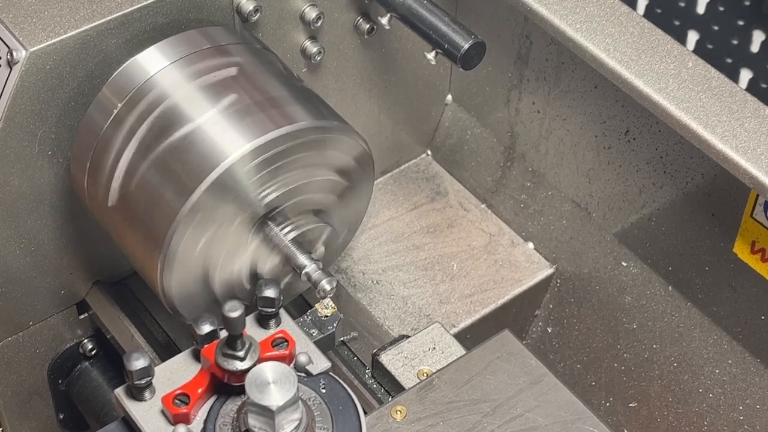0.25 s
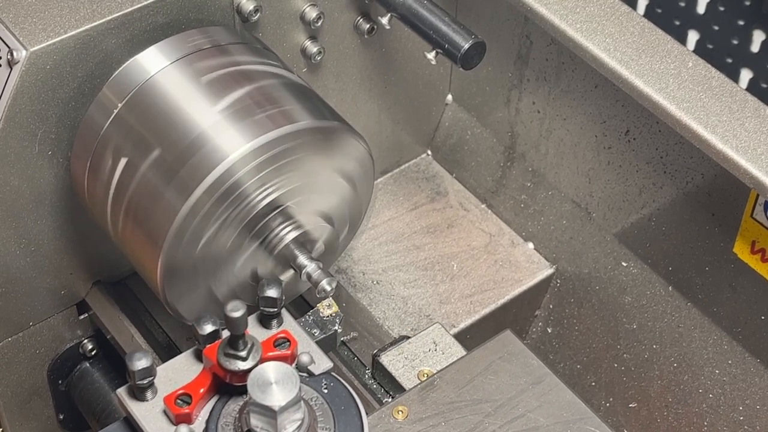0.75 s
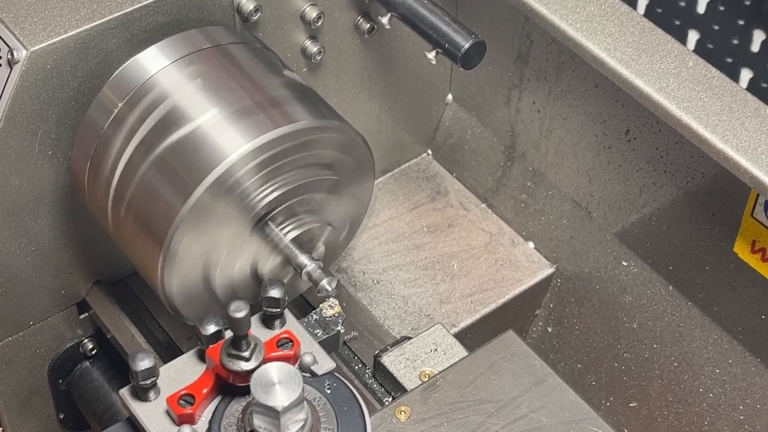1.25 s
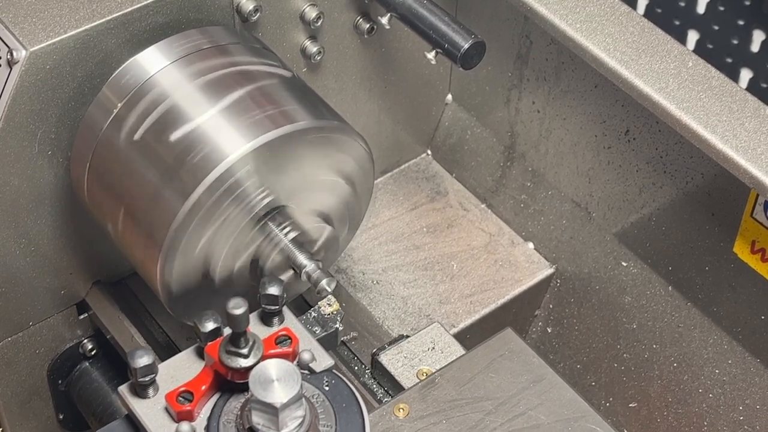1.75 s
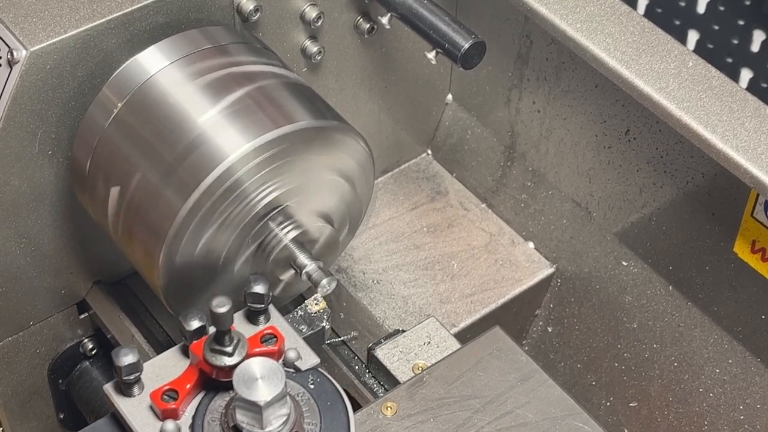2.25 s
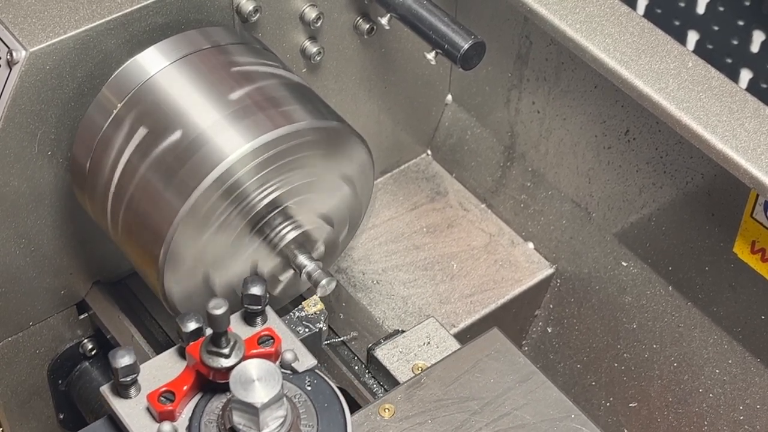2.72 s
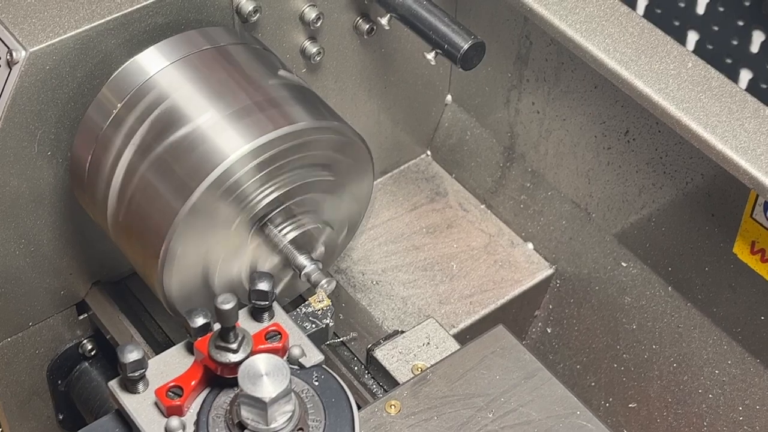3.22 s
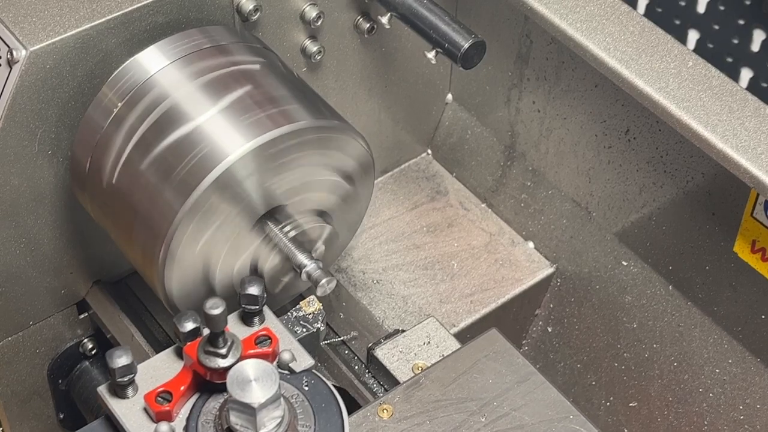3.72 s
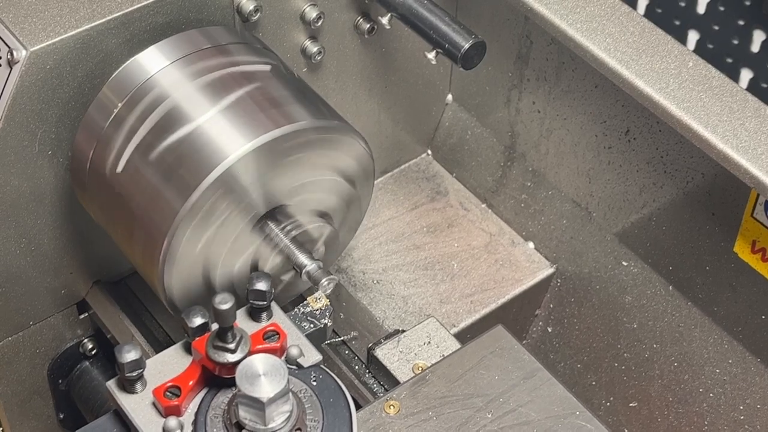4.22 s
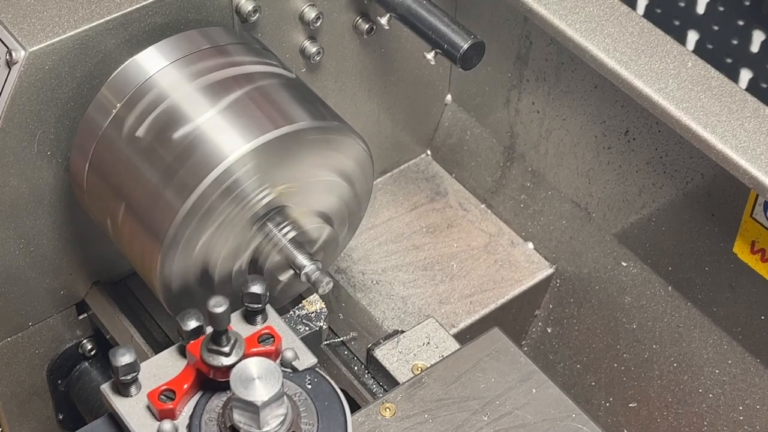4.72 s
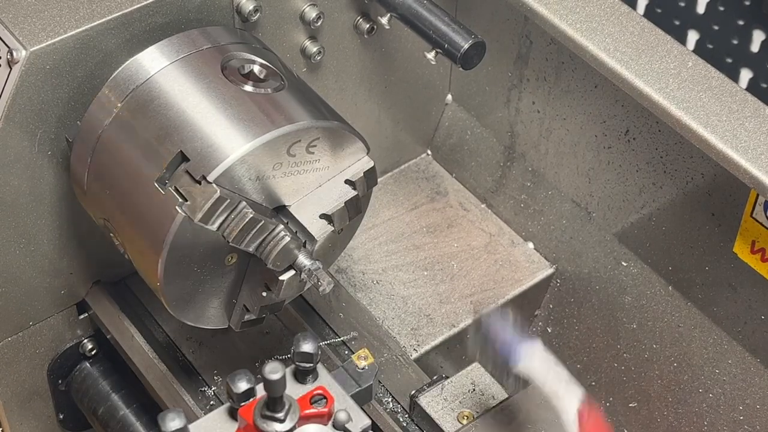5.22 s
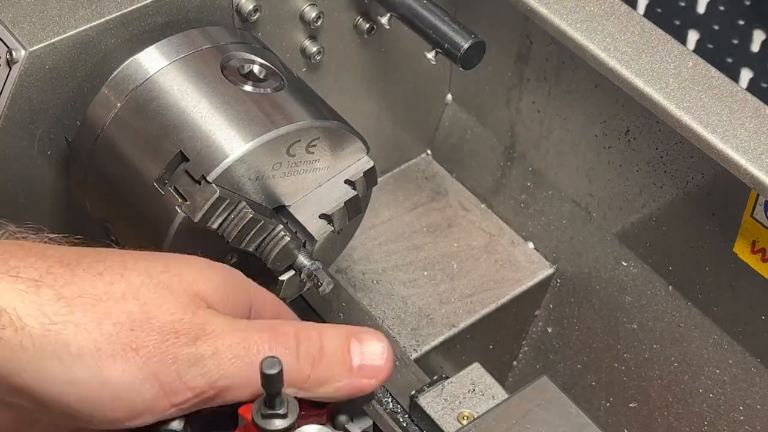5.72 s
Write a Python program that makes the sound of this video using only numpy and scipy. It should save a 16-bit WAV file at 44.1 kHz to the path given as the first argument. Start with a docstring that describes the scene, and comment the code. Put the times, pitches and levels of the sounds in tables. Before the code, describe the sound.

In a quiet workshop, a small metal lathe is heard up close: a steady gear whine, rattling teeth and a rumbling bed, with a faint high motor tone, light cutting sizzle and scattered sharp ticks. Near the end it stops quickly with a brief groan. Short metal scrapes and dull bumps follow as the slide moves back, along with one hard clack on the tool post.

```python
"""A small benchtop lathe trims a metal rod, close by: its gears whine and rattle in the headstock.
Underneath, the bed rumbles and the motor drive sings faintly; on top, the cutter sizzles, with thin ticks.
After five seconds it brakes with a short groan. The slide is drawn back with a few scrapes and bumps,
and metal clacks on the tool post, over the room tone of a quiet workshop."""
import sys
import numpy as np
from scipy import signal
from scipy.fft import rfft, irfft, next_fast_len
from scipy.io import wavfile
from scipy.ndimage import map_coordinates

SR = 44100
rng = np.random.default_rng(int(sys.argv[2]) if len(sys.argv) > 2 else 0)


def wrap_up_sound(samples):
    """Save the sound to the file named by the first command line argument, as 16-bit audio."""
    columns = np.atleast_2d(samples).T
    # keep every value between -1 and 1, then stretch to whole-number steps
    tamed = np.clip(columns, -1, 1)
    steps = np.round(tamed * 32767).astype(np.int16)
    wavfile.write(sys.argv[1], SR, steps)


N = 262836
T = np.arange(N) / SR
MESH_HZ = 914.8  # gear teeth meeting per second
CHUCK_HZ, PULLEY_HZ, IDLER_HZ = 7.68, 12.69, 17.89  # turns per second
BRAKE_S, STOP_S = 4.965, 5.085  # braking starts, spindle stands still

# room tone colour: freq_hz, gain_db
ROOM_EQ = [(25, -2.5), (64, -3.5), (220, -9), (400, -13), (900, -20.5), (1500, -23.5), (3000, -34.5),
           (5500, -38.5), (10000, -45.5), (15000, -55.5)]
# soft bumps of the carriage: crest_s, pitch_hz, half_length_s, level_db
CARRIAGE_BUMPS = [(5.201, 120, .014, -58.5), (5.398, 117, 0.033, -52.5), (5.467, 85, .01, -40.5),
                  (5.488, 62, 0.014, -45), (5.52, 115, 0.016, -50), (5.578, 300, .006, -50),
                  (5.595, 106, 0.0071, -37.5), (5.597, 520, 0.0025, -51), (5.632, 70, 0.017, -59),
                  (5.701, 259, 0.021, -63), (5.703, 680, 0.012, -60), (5.744, 420, .004, -36.5),
                  (5.748, 140, 0.011, -45), (5.809, 64.4, .02, -48.5), (5.828, 250, .012, -59),
                  (5.95, 380, .014, -66.5)]
# strokes of the slide: start_s, length_s, level_db, bright_offset_db
SLIDE_STROKES = [(5.228, 0.049, -69, 7.5), (5.321, 0.04, -47, -29), (5.367, 0.059, -66, -18),
                 (5.455, 0.0366, -46, -23), (5.497, 0.0052, -42.5, -17), (5.507, 0.0075, -42.5, -17),
                 (5.598, 0.0018, -59, 2), (5.62, .03, -68.5, -20), (5.719, 0.031, -47.5, -12.5),
                 (5.757, .032, -53.5, -18), (5.823, 0.042, -68, -8)]
# dull body of a scrape: freq_hz, gain_db
SCRAPE_DULL_EQ = [(100, -8.5), (160, 1), (380, -1.5), (650, -11), (980, -13), (1400, -6), (2450, -15),
                  (2950, -13), (3600, -21), (4200, -18.5), (6200, -29), (8000, -41.5), (14000, -56)]
# bright edge of a scrape: freq_hz, gain_db
SCRAPE_BRIGHT_EQ = [(880, -51.5), (1500, -12), (3090, -6), (3760, -5.5), (7600, -12.5), (8460, -19),
                    (12400, -11), (15500, -22.5)]
# hit on the tool post: start_s, gain_db
POST_HITS = [(5.735, -15)]
# ringing modes of the tool post: pitch_hz, gain_db, t60_s
POST_MODES = [(370, -14.5, 0.084), (628, -14, .06), (970, -17, .05), (1440, -14, .04), (1970, 0.5, 0.013),
              (2170, -19.5, .035), (2600, -7.5, .025), (3480, 5, 0.017), (3700, -16, .022),
              (4510, -4.5, .02), (5250, -4.5, .025), (6560, -12.5, 0.028), (10640, -9, 0.024)]
# attack of the clack: freq_hz, gain_db
CRACK_EQ = [(88, -30), (150, -9), (1620, -6), (1890, 3), (2390, -10.5), (3460, -4.5), (5520, -12),
            (8150, -28), (10900, -15.5), (14600, -28), (15800, -44.5)]
# fader of the running machine, falling away at the stop: time_s, gain_db
RUN_FADER = [(0, 0), (4.985, 0), (5.005, -8.5), (5.032, -10.5), (5.04, -21.5), (5.075, -28), (5.09, -71)]
# switching tones of the motor drive: pitch_hz, relative_db
DRIVE_TONES = [(7698, -76.5), (8780, -79), (8952, -79), (9119, -79), (9265, -78), (9437, -80.5),
               (9528, -77), (9690, -73), (10029, -73.5), (10675, -80.5)]
# the sharpest ticks: start_s, relative_db
SHARP_TICKS = [(0.1406, -43), (0.3815, -42), (0.4778, -45), (0.526, -45), (0.755, -41), (0.8874, -44.5),
               (0.9467, -44.5), (1.3105, -39.5), (1.6821, -45), (1.7424, -44.5), (1.923, -43.5),
               (2.056, -42), (2.37, -46), (2.4653, -44.5), (2.527, -42.5), (2.7631, -41), (2.8389, -41.5),
               (2.8873, -44.5), (3.1762, -47), (3.8267, -45), (3.8631, -42), (3.9115, -44.5), (4.0442, -43),
               (4.2487, -42), (4.9711, -45.5), (5.4894, -57.5)]
# bearing hiss: freq_hz, gain_db
BEARING_EQ = [(7500, -22), (8500, -4.5), (9300, 4.5), (10800, 0), (11300, -4), (13000, -9), (15800, -20.5)]
# cutter sizzle: freq_hz, gain_db
SIZZLE_EQ = [(8500, -32.5), (10000, 0), (11200, 0), (12500, -7.5), (14000, -13.5), (15800, -25.5)]
# bites of the cutter: start_s, hold_s, level_db
CUTTER_BITES = [(0.62, .1, -71), (2.33, .12, -69), (2.98, .14, -62.5), (3.97, .25, -61.5)]
# rumble of the bed: freq_hz, gain_db
BED_EQ = [(20, -18), (60, -13.5), (130, -15), (175, -3.5), (208, -10), (250, -2), (330, 0), (395, -2),
          (440, 1.5), (480, -6.5), (570, -7), (640, -13.5), (760, -16), (1000, -56.5)]
# the machine shakes harder for a moment: crest_s, half_length_s, rumble_rise_db, shudder_rise_db
SHAKE_SURGES = [(0.177, 0.042, 7, 11.5), (0.24, 0.013, 5, 4), (0.423, 0.046, 2, 11), (0.686, 0.029, 6, 1),
                (0.893, .03, 3, 4), (1.05, 0.23, 1, 3.5), (2.452, .03, 4, 3), (3.3, .1, 1.2, 3),
                (4.18, .14, 4, 13.5)]
# groan of the braking motor: time_s, pitch_hz, relative_db
BRAKE_GROAN = [(4.97, 382, -39), (4.988, 380, -33.5), (5.014, 317, -41), (5.044, 364, -47),
               (5.064, 360, -45), (5.08, 362, -69)]
# tone of the gear case: freq_hz, gain_db
CASE_EQ = [(400, -48.5), (700, -27.5), (880, -5), (1100, -14.5), (1250, -3), (1420, -2), (1580, -6.5),
           (1750, -3.5), (2080, -2), (2600, -14.5), (3300, -16), (4000, -22), (5800, -23.5), (7200, -35),
           (8300, -40.5), (11000, -70)]
# narrow rings of the gear train and housing: pitch_hz, nominal_width_hz, relative_db
GEAR_RINGS = [(101.8, 6.9, -57.5), (147.5, 7, -55), (168.8, 9, -52.5), (250.8, 9.1, -51.5),
              (357.4, 23.4, -49.5), (433.7, 25, -51.5), (500, 15, -55.5), (981, 41, -52), (1318, 16.4, -42),
              (1477, 32, -43.5), (1778, 24, -49.5), (2212, 36, -47.5), (2346, 110, -48.5), (2494, 36, -57),
              (3130, 67, -56.5), (3297, 73, -53.5), (3754, 38, -62), (4434, 120, -63.5), (4826, 150, -58.5),
              (5490, 91, -58), (6035, 54, -62.5), (6710, 99, -68), (10690, 160, -70.5), (12440, 70, -84)]
# brief knocks of backlash in the gears: crest_s, rattle_rise_db
BACKLASH_KNOCKS = [(0.32, 2), (0.71, 1), (1.74, 3.5), (1.90, 3.5), (3.95, 1.5), (4.345, 2), (4.41, 2),
                   (4.63, 1)]
# faders of the whine's main tone and third harmonic: time_s, main_relative_db, third_relative_db
WHINE_FADERS = [(0.0, -40.5, -49.5), (0.2, -38.5, -52.5), (1.1, -40.5, -51), (2.1, -38.5, -52.5),
                (2.3, -44, -54.0), (2.45, -39.5, -53), (3.0, -42, -51), (3.1, -39.5, -52.5),
                (3.55, -41.0, -54), (3.75, -43, -48.5), (3.95, -40.5, -51.5), (4.55, -42.5, -53.5),
                (4.7, -39, -52.5), (4.94, -40, -54)]


def amp(db):
    """Decibels to gain."""
    return 10 ** (np.asarray(db) / 20)


def unit(x):
    """Scale to rms 1."""
    return x / np.sqrt(np.mean(x ** 2) + 1e-20)


def running():
    """Gain of the machine: full until it stops short."""
    return amp(np.interp(T, *np.transpose(RUN_FADER)))


def swell(crest_s, half_s):
    """A bell-shaped envelope of height 1."""
    return np.exp(-((T - crest_s) / half_s) ** 2)


def release(start_s, decay_s):
    """An envelope that holds at 1, then dies away."""
    return np.exp(-np.maximum(T - start_s, 0) / decay_s)


def noise():
    """White noise."""
    return rng.standard_normal(N)


def wobble(rate):
    """A smooth random curve at rms 1, rate knots a second."""
    return unit(map_coordinates(rng.standard_normal(int(N * rate / SR) + 4), [T * rate]))


def impacts(per_s, spread_db):
    """Irregular tiny blows of scattered size, at rms 1."""
    return unit((rng.random(N) < per_s / SR) * np.sign(noise()) * amp(spread_db * noise()))


def filtered(x, response):
    """x times a response of frequency."""
    size = next_fast_len(N + SR // 2)
    return irfft(rfft(x, size) * response(np.fft.rfftfreq(size, 1 / SR)), size)[:N]


def coloured(x, eq):
    """x through an EQ curve, at rms 1."""
    freqs, db = np.transpose(eq)
    return unit(filtered(x, lambda hz: amp(np.interp(np.log(hz + 1), np.log(freqs + 1), db))))


def resonance(hz, centre, width):
    """A causal band-pass of gain 1 at its centre."""
    return 1j * hz * width / (centre ** 2 - hz ** 2 + 1j * hz * width)


def noise_band(centre_hz, width_hz):
    """Noise sent twice through a resonance for steep sides, at rms 1."""
    return unit(filtered(noise(), lambda hz: resonance(hz, centre_hz, width_hz) ** 2))


def room_tone(level_db):
    """The low, steady air of the workshop."""
    return amp(level_db) * coloured(noise(), ROOM_EQ)


def steel_ping(start_s, pitch_hz, width_hz, level_db, t60_s):
    """A small steel part rings faintly and unevenly."""
    envelope = (T > start_s) * amp(level_db - 60 * np.abs(T - start_s) / t60_s)
    return envelope * noise_band(pitch_hz, width_hz)


def carriage_bumps(roughness):
    """Soft pushes rock the carriage in short, gritty thuds."""
    grit = 1 + roughness * wobble(500)
    return grit * sum(amp(db) * swell(crest, half) * np.cos(2 * np.pi * hz * (T - crest))
                      for crest, hz, half, db in CARRIAGE_BUMPS)


def friction(eq):
    """Sliding friction: noise thick with tiny catches."""
    return coloured(noise() + .6 * impacts(per_s=1500, spread_db=3), eq)


def slide_scrapes(attack_s, release_s, fade_db, uneven_db):
    """Short strokes of metal sliding on metal, each a burst of tiny slips."""
    dull, bright = np.zeros(N), np.zeros(N)
    for start, length, db, bright_db in SLIDE_STROKES:
        attack = np.clip((T - start) / attack_s, 0, 1)
        progress = np.clip((T - start) / length, 0, 1)
        stroke = attack * amp(db - fade_db * progress) * release(start + length, release_s)
        dull += stroke
        bright += stroke * amp(bright_db)
    flicker = amp(uneven_db * wobble(120))
    return flicker * (dull * friction(SCRAPE_DULL_EQ) + bright * friction(SCRAPE_BRIGHT_EQ))


def tool_post_clack(ring_db, crack_db, crack_t60_s, choke_s):
    """A hard contact cracks and rings the tool post, choked as the parts stay pressed together."""
    out, t = np.zeros(N), np.arange(SR // 6) / SR
    gate = (1 - np.exp(-t / .0004)) * np.exp(-np.maximum(t - choke_s, 0) / 0.0018)
    for start, db in POST_HITS:
        ring = sum(amp(mode_db + rng.normal(0, 1) - 60 * t / t60)
                   * np.sin(2 * np.pi * (hz * t + rng.random())) for hz, mode_db, t60 in POST_MODES)
        crack = coloured(noise(), CRACK_EQ)[:len(t)] * amp(-60 * t / crack_t60_s)
        out[round(start * SR):][:len(t)] += amp(db) * gate * (amp(ring_db) * ring + amp(crack_db) * crack)
    return out


def motor_drive(gain_db, waver_hz):
    """The drive's high switching tones waver together with the motor speed."""
    drift = waver_hz * wobble(12)
    tones = np.zeros(N)
    for hz, db in DRIVE_TONES:
        level = amp(db + gain_db + 2.7 * wobble(20))
        pitch = hz + drift + 3 * wobble(40)
        tones += level * np.sin(2 * np.pi * np.cumsum(pitch) / SR)
    return tones


def ticks(sharp_gain_db, crackle_db, per_s, spread_db, t60_s):
    """Thin, sharp ticks, with a weaker crackle between them while the lathe runs."""
    hits = running() * amp(crackle_db - spread_db * rng.random(N)) * (rng.random(N) < per_s / SR)
    for start, db in SHARP_TICKS:
        hits[round(start * SR)] += amp(db + sharp_gain_db)
    snap = amp(-60 * np.arange(SR // 100) / SR / t60_s)  # an abrupt step that relaxes at once
    return signal.fftconvolve(hits, snap)[:N]


def cutter(hiss_db, graze_db, attack_s, release_s):
    """The edge grazes the rod and bites now and then: shearing metal sizzles over the bearings' hiss."""
    bites = sum(amp(db) * np.clip((T - start) / attack_s, 0, 1) * release(start + hold, release_s)
                for start, hold, db in CUTTER_BITES)
    hiss = amp(hiss_db) * coloured(noise(), BEARING_EQ)
    sizzle = coloured(noise() + impacts(per_s=1190, spread_db=5.5), SIZZLE_EQ)
    return hiss + np.hypot(amp(graze_db), bites) * sizzle


def surges():
    """Swells of harder shaking: the rise in dB of the rumble and of the shudder."""
    return sum(np.outer([rumble_db, shudder_db], swell(crest, half))
               for crest, half, rumble_db, shudder_db in SHAKE_SURGES)


def bed_rumble(rumble_db, uneven_db, shudder_db, shaft_hz, hum_db, braking_db):
    """The bed rumbles with the bearings, shudders on the bench and hums with the shaft's unbalance."""
    rumble_rise, shudder_rise = surges()
    braking = np.clip((T - BRAKE_S) / (STOP_S - BRAKE_S), 0, 1)
    level = amp(rumble_db + rumble_rise + uneven_db * wobble(20) + braking_db * braking ** 2)
    rumble = level * coloured(noise() + 0.68 * impacts(per_s=120, spread_db=2), BED_EQ)
    shudder = amp(shudder_db + shudder_rise + 2 * wobble(10)) * noise_band(centre_hz=118, width_hz=80)
    hum = amp(hum_db) * np.sin(2 * np.pi * shaft_hz * T)
    turning = np.clip((STOP_S - T) / 0.012, 0, 1)
    return turning * rumble + running() * (shudder + hum)


def brake_groan(gain_db, sub_octave_db, fade_s):
    """The braking motor groans briefly, with a weaker tone an octave below."""
    times, hz, db = np.transpose(BRAKE_GROAN)
    phase = 2 * np.pi * np.cumsum(np.interp(T, times, hz)) / SR
    gate = np.clip(np.minimum(T - BRAKE_S, STOP_S - T) / fade_s, 0, 1)
    level = amp(np.interp(T, times, db) + gain_db) * gate
    return np.sqrt(2) * level * (np.sin(phase) + amp(sub_octave_db) * np.sin(phase / 2))


def guard_ring(x, t60_s, wet):
    """The sheet-metal guard adds a dense cloud of short modes."""
    t = np.arange(SR // 6) / SR
    tail = rng.standard_normal(len(t)) * amp(-60 * t / t60_s)
    return x + wet * signal.fftconvolve(x, tail / np.linalg.norm(tail))[:N]


def turn(hz, crest_s):
    """A swing between -1 and 1, once per turn of a shaft."""
    return np.cos(2 * np.pi * hz * (T - crest_s))


def gear_rattle(rattle_db, rings_gain_db, grain, uneven_db, surge_share):
    """Teeth rattle and ring the case, harder once per turn of each shaft and in surges and knocks."""
    turns_db = 0.24 * turn(CHUCK_HZ, 0.064) + 0.54 * turn(PULLEY_HZ, 0.08) + .45 * turn(IDLER_HZ, 0.047)
    knocks_db = sum(db * swell(crest, half_s=0.01) for crest, db in BACKLASH_KNOCKS)
    rumble_rise, _ = surges()
    flicker_db = uneven_db * wobble(50) + 0.24 * wobble(6)
    throb = amp(turns_db + knocks_db + surge_share * rumble_rise + flicker_db)
    blows = guard_ring(noise() + grain * impacts(per_s=600, spread_db=1.5), t60_s=.12, wet=0.29)
    case = amp(rattle_db) * coloured(throb * blows, CASE_EQ)
    # the rings are all shaken together by the same throb of the train
    rings = sum(amp(db) * noise_band(hz, 1.72 * width) for hz, width, db in GEAR_RINGS)
    return case + amp(rings_gain_db) * throb * rings


def gear_whine(main_gain_db, third_gain_db, flutter_hz, drift_hz, shake_db, third_shake_db,
               smear_rad, sway_rad, release_s):
    """Teeth mesh at a steady rate; uneven ones flutter the pitch and level. Braking unloads them."""
    times, main_db, third_db = np.transpose(WHINE_FADERS)
    pitch = MESH_HZ + flutter_hz * wobble(40) + drift_hz * wobble(9)
    phase = 2 * np.pi * np.cumsum(pitch) / SR
    sway = sway_rad * np.sin(2 * np.pi * CHUCK_HZ * T + .6 * wobble(2.05))  # about once per chuck turn
    shake = unit(1 + (amp(shake_db) - 1) * wobble(36))
    main_level = amp(np.interp(T, times, main_db) + main_gain_db) * shake
    main = main_level * np.sin(phase + sway + smear_rad * wobble(40))
    third_level = amp(np.interp(T, times, third_db) + third_gain_db + third_shake_db * wobble(30))
    third = third_level * np.sin(3 * phase)
    return np.sqrt(2) * release(BRAKE_S, release_s) * (main + third)


def scene():
    """The mono mix: the running lathe, then the handling, over a quiet workshop."""
    machine = gear_whine(main_gain_db=-.5, third_gain_db=2.5, flutter_hz=2.42, drift_hz=1.797,
                         shake_db=2.5, third_shake_db=1.3, smear_rad=0.67, sway_rad=0.6, release_s=0.027)
    machine += gear_rattle(rattle_db=-35.5, rings_gain_db=-0.22, grain=0.77, uneven_db=0.77,
                           surge_share=0.16)
    machine += motor_drive(gain_db=6, waver_hz=3)
    machine += cutter(hiss_db=-64.5, graze_db=-76, attack_s=.05, release_s=.17)
    mix = running() * machine
    mix += bed_rumble(rumble_db=-41, uneven_db=1.14, shudder_db=-55.5, shaft_hz=45.8, hum_db=-61,
                      braking_db=-17)
    mix += brake_groan(gain_db=1, sub_octave_db=-11, fade_s=0.0069)
    mix += slide_scrapes(attack_s=0.0016, release_s=0.0013, fade_db=3.5, uneven_db=1)
    mix += carriage_bumps(roughness=0.52)
    mix += steel_ping(start_s=5.625, pitch_hz=5080, width_hz=250, level_db=-81, t60_s=.3)
    mix += tool_post_clack(ring_db=-8.5, crack_db=-7.5, crack_t60_s=0.04, choke_s=0.014)
    mix += ticks(sharp_gain_db=16, crackle_db=-32, per_s=40, spread_db=9, t60_s=0.00033)
    mix += room_tone(level_db=-69.5)
    return mix[None]


def record(dry):
    """The microphone's colour: a hollow near 8.4 kHz and a hard high cut."""
    high_cut_hz = 15850
    hollow = lambda hz: 1 - 0.6 * resonance(hz, 8370, 600)
    return filtered(dry[0], lambda hz: hollow(hz) * (hz < high_cut_hz))[None]


dry = scene()
out = record(dry)
wrap_up_sound(out)
```